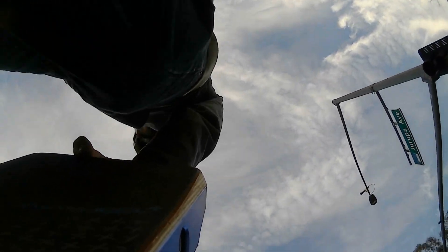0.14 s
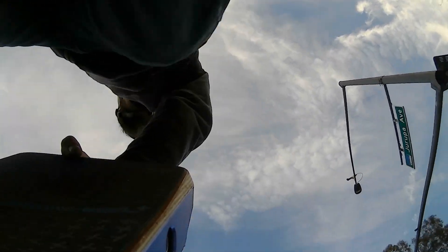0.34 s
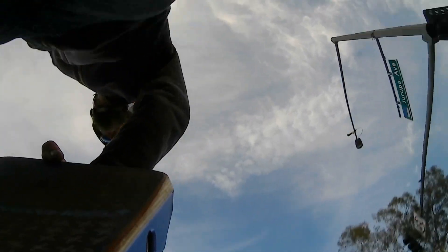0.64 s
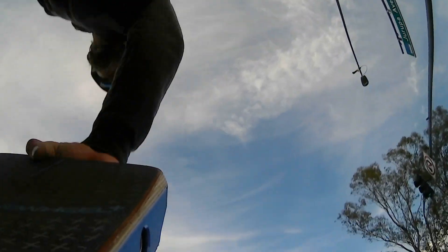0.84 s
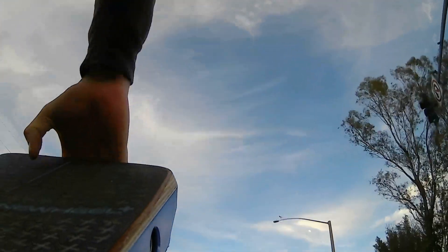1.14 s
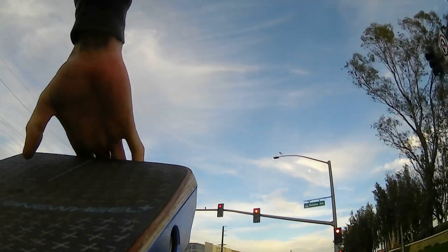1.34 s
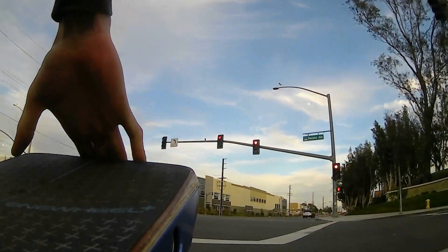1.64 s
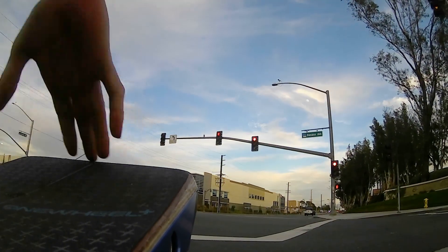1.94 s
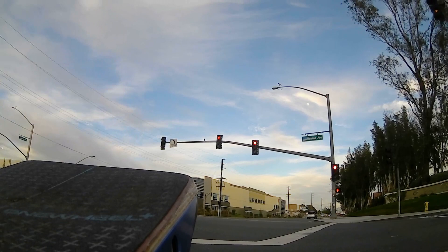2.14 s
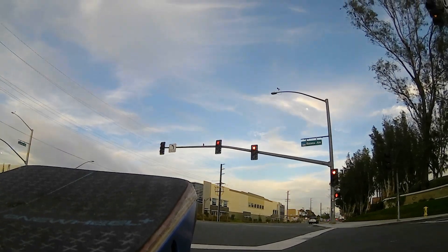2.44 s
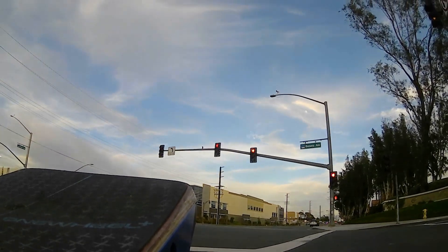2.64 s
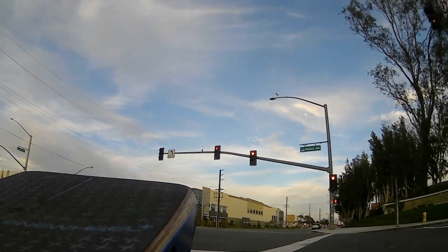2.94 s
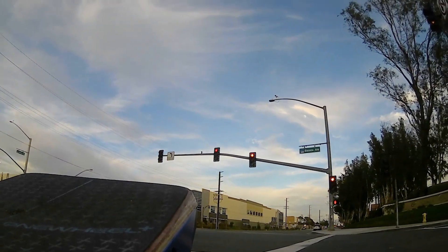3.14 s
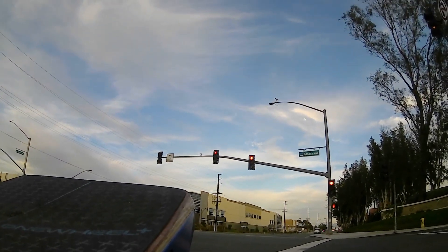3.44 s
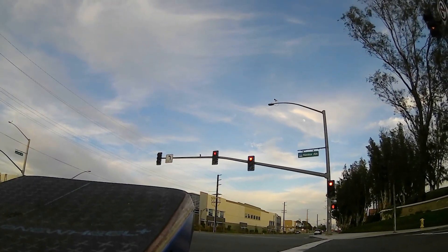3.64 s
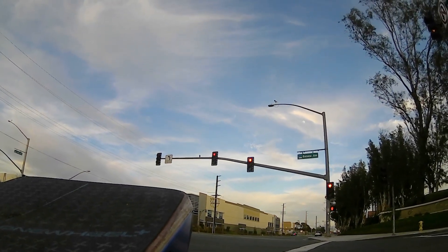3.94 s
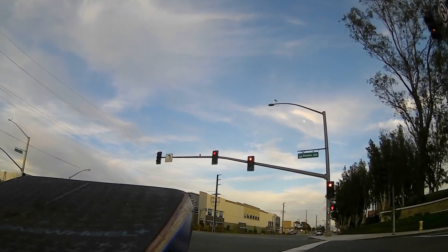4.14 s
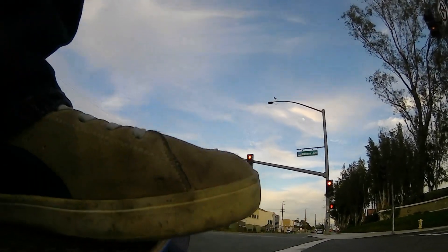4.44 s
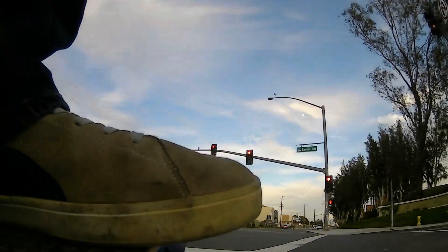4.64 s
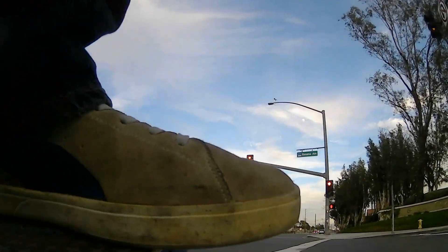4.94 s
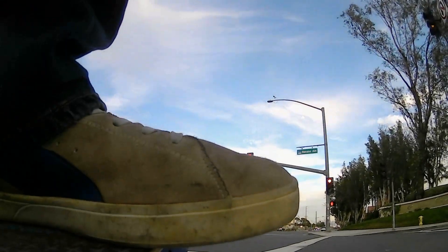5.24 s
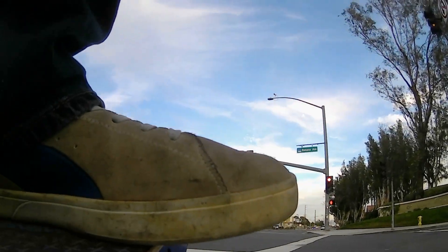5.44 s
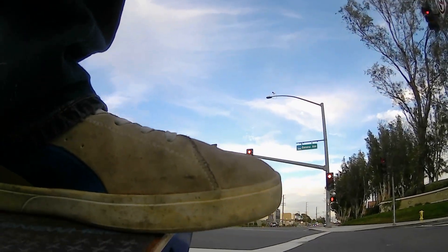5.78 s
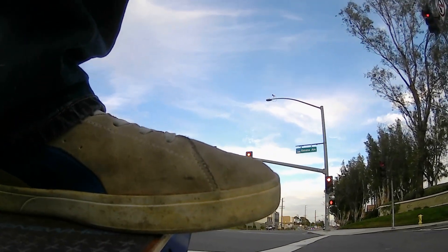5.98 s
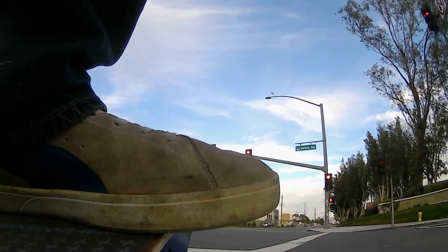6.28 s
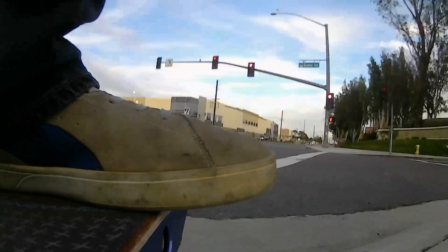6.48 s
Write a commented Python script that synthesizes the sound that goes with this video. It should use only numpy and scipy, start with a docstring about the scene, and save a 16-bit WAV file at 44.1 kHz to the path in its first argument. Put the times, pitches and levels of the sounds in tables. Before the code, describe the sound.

Harsh clattering judder of a heavy board hitting pavement, followed by small scrapes, ticks and a few heavy foot knocks above distant street hum.

```python
"""A one-wheeled electric board is set down at a quiet crossing, heard by a small camera bolted to its frame.
Faint rubs come first, over a distant traffic hum that lasts throughout (band-filtered noise).
Then the tipped board slams and rocks on the ground, overloading the input: cracks, thuds and rising sine rings.
Hands, grit and a shoe go on to rub and knock it: clicks and bursts ring deck, rail and housing resonators.
Late on come a few heavy knocks, one more slam and a strong rub."""
import sys
import numpy as np
from scipy import signal
from scipy.fft import rfft, irfft
from scipy.io import wavfile
from scipy.ndimage import uniform_filter1d

SR = 44100
rng = np.random.default_rng(int(sys.argv[2]) if len(sys.argv) > 2 else 0)


def store_wav(level_fs):
    """Save 16-bit WAV to argv[1]."""
    pcm = np.round(np.clip(np.atleast_2d(level_fs), -1, 1) * 32767)
    wavfile.write(sys.argv[1], SR, pcm.T.astype(np.int16))


N = 291501

# Slams of the tipped board: start_s, crack_drive_db, ring_peak_db, ring_start_hz, free_s (until smothered)
SLAMS = [(.593, -1.5, 10.5, 540, 0.0029), (.627, 3, 9, 501.6, .008), (.661, -7, 17.5, 483, .013),
         (.696, 7, 15, 503, 0.014), (.729, -10, 8.5, 497, .014), (0.76, -10, 2, 484.6, 0.027),
         (0.79, -2.5, 7, 496, .012), (5.0287, -23, -5.5, 487, 0.017)]
# Rocking back onto the other end: start_s, crack_drive_db, thud_level_db
REBOUNDS = [(0.571, -6, -4.5), (0.58, 24, -1.5), (0.589, 15, -10.5), (0.603, -9.5, 8), (.612, -24.5, 4),
            (.619, 24.5, -4), (.638, -29, -5.5), (.645, -15.5, -7), (0.653, -19, -2), (0.683, -8.5, 0),
            (.713, -28.5, -10), (0.722, -27.5, -5), (0.751, -22.5, -1)]
# Contacts of hand or sole: tick_s, housing_drive_db, rails_drive_db, deck_drive_db
KNOCKS = [(0.2662, -35, -33.5, -32), (0.979, -34, -17, -36), (1.0404, -29, -62, -50),
          (1.1767, -10.5, -27, -27.5), (1.2234, -17, -21, -22), (1.3074, -21.5, -24.5, -25),
          (1.4486, -16, -27.5, -33.5), (1.481, -9, -27.5, -42.5), (1.497, -10.5, -23.5, -35),
          (1.5786, -34.5, -14, -33), (1.6268, 2, -4, -19), (1.6445, 1, -10, -39), (1.6727, -8, -34, -47),
          (1.6913, -10, -49, -46), (1.7084, -12, -43, -21.5), (1.799, -9, -48, -33),
          (1.8097, -6.5, -56, -35), (1.8411, -8, -40, -36), (2.1076, -15.5, -22, -24),
          (2.24, -34.5, -39.5, -57), (2.7075, -22.5, -13, -11.5), (2.7278, -20, -30, -41),
          (2.7608, -26, -32, -39), (2.8579, -21.5, -42, -60), (3.2246, -10, -50, -40),
          (3.2444, -20, -35, -25.5), (3.2916, -25, -65, -64), (3.819, -26, -49, -51.5),
          (3.872, -31, -64, -43), (3.8934, -30, -47, -61), (3.9935, -25.5, -45, -38.5),
          (4.2064, -37, -33, -40.5), (4.344, -10, 6, 6.5), (4.3578, -30, 3.5, 0.5),
          (4.4175, -48.5, -49, -16), (4.4862, -29, -62, -59.5), (4.5402, -24.5, -27, -56),
          (4.569, -27.5, -24.5, -36), (4.6388, -37, -41, -55.5), (4.8273, -3, -27.5, -31),
          (4.9803, -16.5, -1, -0.5), (5.0055, -21, -5.5, -38), (5.0302, -34, -13.5, -11),
          (5.0559, -35, -26, -33), (5.1537, -27.5, -45, -43), (5.1668, -26, -70, -55),
          (5.2883, -22.5, -57, -54), (5.2993, -24, -44, -45), (5.5084, -20.5, -56, -45),
          (5.5497, -24, -43.5, -41), (5.6301, -21, -24, -37), (5.658, -30, -22, -12.5),
          (5.9004, -30.5, -44, -51), (6.2164, -29, -25, -30), (6.3705, -26, -31, -28),
          (6.3927, -35, -62, -44), (6.531, -48, -30, -34)]
# Strokes of hand and shoe: full_pressure_s, rise_s, hold_s, release_s, housing_db, rails_db, deck_db
STROKES = [(0.35, .1, 0.045, .06, -50.5, -66, -64.5), (0.478, .06, 0.039, 0.056, -52, -64.5, -62.5),
           (0.795, .03, 0.16, 0.056, -35.5, -32, -40), (1.172, .12, 0.065, 0.045, -30.5, -23.5, -30),
           (1.294, .01, .005, 0.21, -45.5, -41.5, -43.5), (1.415, .03, 0.0072, 0.014, -33.5, -40.5, -40.5),
           (1.493, .04, 0.01, 0.022, -31, -35, -47.5), (1.619, .06, 0.027, 0.031, -24.5, -20, -23.5),
           (1.687, .03, 0.017, 0.049, -21.5, -32.5, -53), (1.784, .01, 0.011, 0.019, -26, -40, -40),
           (1.819, .01, 0.047, 0.0098, -26.5, -39.5, -37), (1.869, .02, 0.1, 0.039, -40, -34, -48),
           (2.053, .02, 0.081, 0.026, -40, -43, -40), (2.285, .06, .005, 0.092, -51, -66, -61),
           (2.343, .05, 0.0041, .06, -58, -59, -50), (2.721, .01, 0.0034, 0.11, -35.5, -38.5, -28.5),
           (2.836, 0.024, .09, 0.032, -42, -45, -42.5), (3.006, .05, 0.013, 0.012, -35, -46.5, -44),
           (3.124, .06, 0.12, .03, -36.5, -34.5, -35.5), (3.291, .012, 0.0048, 0.036, -38.5, -54, -44.5),
           (3.807, .04, 0.0056, .025, -39.5, -52.5, -50.5), (3.903, .05, 0.039, .02, -52.5, -58, -58),
           (3.99, .04, .005, 0.13, -46.5, -54, -44), (4.208, .05, 0.0043, .03, -49, -41, -47),
           (4.363, .01, 0.0056, 0.028, -32.5, -22.5, -15), (4.384, .02, 0.091, 0.076, -51, -46.5, -43),
           (4.532, .015, 0.12, .015, -51, -46.5, -50.5), (4.712, .035, .005, .025, -45, -65, -60.5),
           (4.794, .01, 0.017, .02, -47, -47, -44), (4.829, .005, .005, 0.06, -40, -39.5, -42.5),
           (4.901, 0.011, .03, 0.017, -32.5, -37, -33.5), (4.982, .01, 0.049, 0.038, -46.5, -30.5, -31.5),
           (5.048, .01, 0.075, 0.034, -53, -50, -49), (5.283, .04, 0.016, .05, -43, -58, -49),
           (5.342, .015, 0.03, 0.039, -38, -33, -35.5), (5.403, 0.077, 0.027, 0.052, -13.5, -16.5, -20.5),
           (5.509, .005, 0.004, 0.021, -35, -47, -51), (5.576, .015, 0.095, 0.079, -37, -33, -35),
           (5.829, .1, 0.0035, 0.012, -49.5, -46.5, -51.5), (5.931, .05, 0.0062, 0.077, -39.5, -34.5, -42),
           (6.05, .015, .01, 0.011, -48, -60, -60), (6.086, 0.009, 0.0092, 0.032, -39.5, -33.5, -44.5),
           (6.218, .03, 0.0047, .035, -64, -38, -49.5), (6.366, .08, 0.0075, 0.039, -42.5, -37.5, -41),
           (6.449, 0.028, 0.061, 0.018, -62.5, -49.5, -49), (6.525, 0.014, 0.17, .03, -57.5, -46, -43.5)]
# Modes of the deck: mode_hz, t60_s (at damping 1), level_db
DECK_MODES = [(140.4, 0.15, -10.5), (208.2, 0.45, -8), (235.6, 0.17, -8), (298.3, 0.092, 2.5),
              (400, 0.037, 1.5), (324, 0.052, -3)]
# Modes of the rails: mode_hz, t60_s (at damping 1), level_db
RAIL_MODES = [(471, 0.057, -10), (569.6, 0.062, -11), (637, 0.037, -1), (717.1, 0.087, -2),
              (1018.7, 0.084, -10.5), (1252, 0.091, -18), (795, 0.005, -14.5), (1397, 0.078, -13),
              (1568, 0.044, -10), (1880, 0.06, -15)]
# Modes of the housing: mode_hz, t60_s (at damping 1), level_db
HOUSING_MODES = [(1727, 0.011, -2), (2333, 0.023, -12), (2641, 0.024, -6), (3017, 0.021, -1),
                 (3211, 0.033, -0.5), (3536, 0.026, -6.5), (3838, 0.036, -12), (4950, 0.0057, -12),
                 (5920, 0.0046, -14), (7140, 0.0033, -12)]
# Relative spectrum of the street: frequency_hz, density_db (per Hz)
STREET_SPECTRUM = [(65, -69), (110, -35.5), (144, -12.5), (285, -6), (323, -2.5), (446, -10.5), (685, -7.5),
                   (777, -14.5), (1310, -18), (1680, -19.5), (2080, -23.5), (2780, -16), (3570, -20),
                   (8000, -37), (10400, -69.5), (17600, -120)]
# Level of the street over time: time_s, level_db
STREET_LEVEL = [(0, -51.5), (0.502, -51), (2.3, -54.5), (2.651, -55.5), (3.5, -57), (5, -55),
                (6.602, -56.5)]

RING_T60_S, RING_RISE_HZ_PER_S, RING_RISE_S, MUTE_DB_PER_S = 0.046, 10000, 0.022, 1800
THUD_MEAN_HZ, THUD_T60_S, THUD_OVERTONE_DB = 333, 0.025, -6
SLAM_THUD_RE_RING_DB, RATTLE_RE_SHAKE_DB = -24.5, -3
CRACK_DECAY_S, RATTLE_DECAY_S, CRACK_DAMPING = 0.0023, 0.009, 5.0

TICK_DECAY_S, SCUFF_DECAY_S, SHOVE_S, LEAD_S = 0.0042, 0.0043, 0.0013, 0.002
SOFT_DB_PER_DB, SPREAD_PER_SOFT_DB, DAMPING_PER_SOFT_DB = 0.56, 0.08, 0.036
BLOW_DAMPING, SHOVE_DAMPING, BLOW_COLOUR_DB = 1.37, 2.0, 2.0

GRAINS_PER_S, GRAIN_SPREAD_DB, PATCH_DB, RAMP_DB = 2200, 3, 3, 26  # RAMP_DB: change over a rise or release
SENSOR_TOP_HZ, TOP_HZ = 8226, 16000


def undb(db):
    """Convert dB to an amplitude factor."""
    return 10 ** (np.asarray(db) / 20)


def unit(x):
    """Scale to rms 1."""
    return x / np.sqrt(np.mean(x ** 2))


def add(out, start_s, x):
    """Mix a short sound in at start_s."""
    i = int(start_s * SR)
    out[i:i + len(x)] += x[:N - i]


def walk(rate_hz):
    """Random levels held 1 / rate_hz s and slewed; spread near 1."""
    hold = int(SR / rate_hz)
    steps = np.repeat(rng.standard_normal(N // hold + 1), hold)
    return uniform_filter1d(steps, hold)[:N]


def burst(decay_s):
    """A sharp first contact and a crackle of decaying noise, with unit energy."""
    t = np.arange(2048) / SR
    x = rng.standard_normal(len(t)) * np.exp(-t / decay_s)
    x[0] = np.sqrt(np.sum(x ** 2))
    return x / np.sqrt(np.sum(x ** 2))


def ring(force, modes, damping=0.97):
    """A force through damped resonators; a unit impulse gives a peak near 1."""
    out = 0
    for k, (hz, t60_s, db) in enumerate(modes):
        radius = np.exp(-np.log(1000) * damping / (max(t60_s, 0.002) * SR))
        angle = 2 * np.pi * hz / SR
        poles = [1, -2 * radius * np.cos(angle), radius * radius]
        sign = (-1) ** k
        out = out + sign * undb(db) * signal.lfilter([0, np.sin(angle)], poles, force)
    return out / np.sqrt(np.sum(undb(np.array(modes)[:, 2]) ** 2))


def struck_at(modes, tilt_db_per_octave=0.0):
    """The same modes reweighted at random, as for a blow on another spot, and dulled by the tilt."""
    spot_db = BLOW_COLOUR_DB * rng.standard_normal(len(modes))
    first_hz = modes[0][0]
    return [(hz, t60_s, db + d - tilt_db_per_octave * np.log2(hz / first_hz))
            for (hz, t60_s, db), d in zip(modes, spot_db)]


def slam_ring(ring_db, start_hz, free_s, t):
    """Hollow ring: pitch climbs as the deck presses flat, then the ring is smothered."""
    pitch_hz = start_hz + RING_RISE_HZ_PER_S * np.minimum(t, RING_RISE_S)
    fade_db = 60 * t / RING_T60_S + MUTE_DB_PER_S * np.maximum(t - free_s, 0)
    return np.sin(2 * np.pi * np.cumsum(pitch_hz) / SR) * undb(ring_db - fade_db)


def thud(level_db, t):
    """Dull thud: two decaying partials, pitch varied per bounce."""
    phase = 2 * np.pi * THUD_MEAN_HZ * (1 + 0.12 * rng.standard_normal()) * t
    tone = np.sin(phase) + undb(THUD_OVERTONE_DB) * np.sin(2.2 * phase)
    return -tone * undb(level_db - 60 * t / THUD_T60_S)


def judder():
    """Each bounce cracks, thuds and rattles loose parts; a slam adds a hollow ring."""
    out, crack, rattle = np.zeros((3, N))
    t = np.arange(4096) / SR
    bounces = []
    for s, crack_db, ring_db, start_hz, free_s in SLAMS:
        add(out, s, slam_ring(ring_db, start_hz, free_s, t))
        bounces.append((s, crack_db, ring_db + SLAM_THUD_RE_RING_DB, ring_db))
    bounces += [(s, crack_db, thud_db, thud_db) for s, crack_db, thud_db in REBOUNDS]
    for s, crack_db, thud_db, shake_db in bounces:
        add(out, s, thud(thud_db, t))
        add(crack, s, undb(crack_db) * burst(CRACK_DECAY_S))
        add(rattle, s, undb(shake_db + RATTLE_RE_SHAKE_DB) * burst(RATTLE_DECAY_S))
    loose = ring(rattle, RAIL_MODES, CRACK_DAMPING)
    loose = loose + undb(-5.0) * ring(rattle, HOUSING_MODES, CRACK_DAMPING) + undb(-8.0) * rattle
    return out + loose + ring(crack, HOUSING_MODES, CRACK_DAMPING) + undb(7.0) * crack


def knocks():
    """A gritty tick rings housing and rails, a soft shove the deck; the hand or sole that strikes also damps."""
    out, shove = np.zeros(N), np.hanning(int(SHOVE_S * SR) + 2)
    for tick_s, housing_db, rails_db, deck_db in KNOCKS:
        # Little tick for its weight: a rubber sole, a dull blow, longer grit crunch
        soft_db = SOFT_DB_PER_DB * max(rails_db - housing_db, 0)
        tick_decay_s = TICK_DECAY_S * (1 + SPREAD_PER_SOFT_DB * soft_db)
        tick, scuff, push = np.zeros((3, 16384))
        add(tick, LEAD_S, undb(housing_db) * burst(tick_decay_s))
        add(scuff, 0, undb(rails_db) * burst(SCUFF_DECAY_S))
        add(push, 0, undb(deck_db) * shove / shove.sum())
        weight_s = tick_s - LEAD_S  # weight arrives just before the tick
        rail_damping = BLOW_DAMPING + DAMPING_PER_SOFT_DB * soft_db
        add(out, weight_s, ring(tick, struck_at(HOUSING_MODES, -1.8), BLOW_DAMPING))
        add(out, weight_s, ring(scuff, struck_at(RAIL_MODES, soft_db), rail_damping))
        add(out, weight_s, ring(push, struck_at(DECK_MODES), SHOVE_DAMPING))
    return out


def stroke_pressure():
    """Pressure on housing, rails and deck: exponential rise, hold and release per stroke."""
    t, pressure = np.arange(N) / SR, np.zeros((3, N))
    for s, rise_s, hold_s, release_s, *db in STROKES:
        first = max(int((s - 3 * rise_s) * SR), 0)
        near = slice(first, int((s + hold_s + 3 * release_s) * SR))
        before = np.maximum((s - t[near]) / rise_s, 0)
        after = np.maximum((t[near] - s - hold_s) / release_s, 0)
        pressure[:, near] += undb(np.array(db)[:, None] - RAMP_DB * (before + after))
    return pressure


def rubbing():
    """Grit catches and slips: dense uneven clicks in patches, driving each part of the board."""
    out = 0
    catch = (rng.random(N) < GRAINS_PER_S / SR) * undb(GRAIN_SPREAD_DB * rng.exponential(size=N))
    patches_db = PATCH_DB * walk(60)
    for pressure, modes in zip(stroke_pressure(), (HOUSING_MODES, RAIL_MODES, DECK_MODES)):
        grit = catch * rng.standard_normal(N) * undb(patches_db + 0.96 * walk(22))
        steady_rms = np.sqrt(np.mean(ring(grit, modes) ** 2))
        out = out + ring(pressure * grit, modes) / steady_rms
    return out


def street():
    """Distant traffic hum: noise in half-octave bands that flutter together and drift slowly alone."""
    hz = np.fft.rfftfreq(N, 1 / SR) + 1  # offset avoids log(0)
    point_hz, point_db = np.transpose(STREET_SPECTRUM)
    colour_db = np.interp(np.log(hz), np.log(point_hz), point_db)
    spectrum = rfft(rng.standard_normal(N)) * undb(colour_db)
    out, flutter = 0, walk(11.0)
    for octave in np.arange(6, 13.6, 0.5):  # log2 of band centre in Hz
        band = np.clip(1 - 2 * abs(np.log2(hz) - octave), 0, 1)
        drift = walk(1)
        out = out + irfft(spectrum * band, N) * undb(0.62 * flutter + 0.5 * drift)
    time_s, level_db = np.transpose(STREET_LEVEL)
    return unit(out) * undb(np.interp(np.arange(N) / SR, time_s, level_db))


def scene():
    """Sum board and street into one channel."""
    return (judder() + knocks() + rubbing() + street())[None]


def low_pass(x, top_hz):
    """Steep elliptic low-pass."""
    return signal.sosfilt(signal.ellip(8, 0.2, 70, top_hz, fs=SR, output="sos"), x)


def record(dry):
    """Bass cut, an input stage that overloads flat, its narrow band, overshoot clipped again, final low-pass."""
    x = signal.sosfilt(signal.butter(2, 140, "high", fs=SR, output="sos"), dry)
    x = low_pass(np.clip(x, -0.97, 0.97), SENSOR_TOP_HZ)
    return low_pass(np.clip(x, -1, 1), TOP_HZ)


dry = scene()
out = record(dry)
store_wav(out)
```